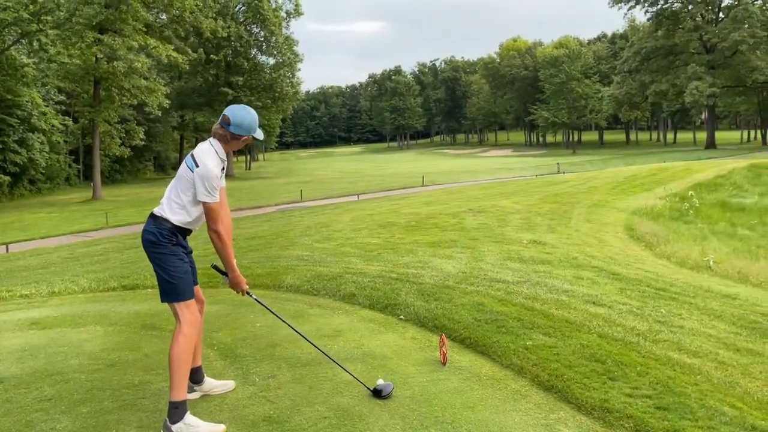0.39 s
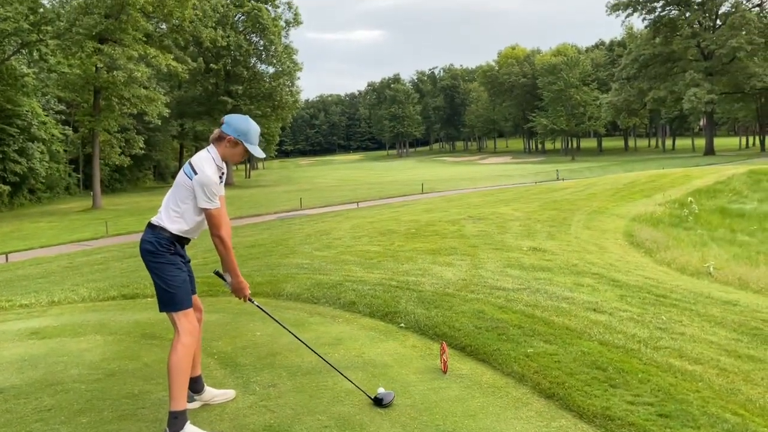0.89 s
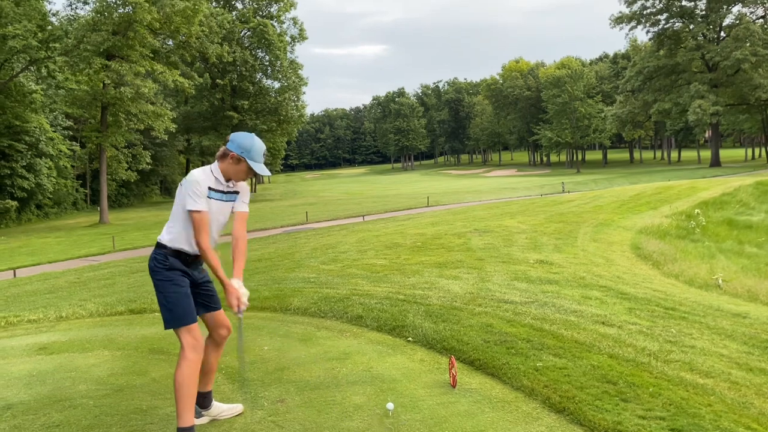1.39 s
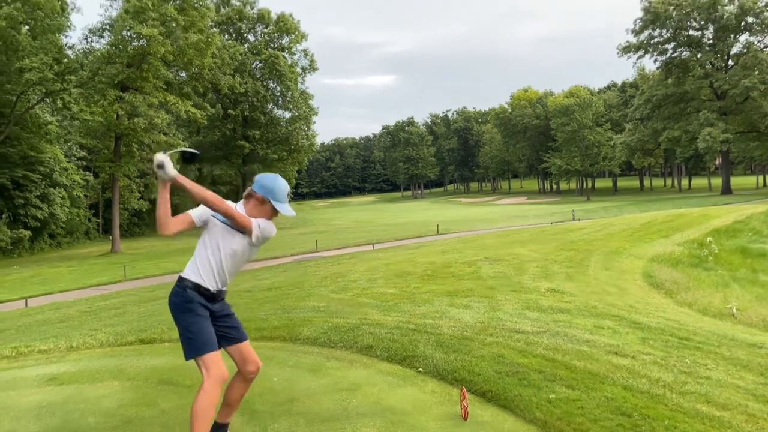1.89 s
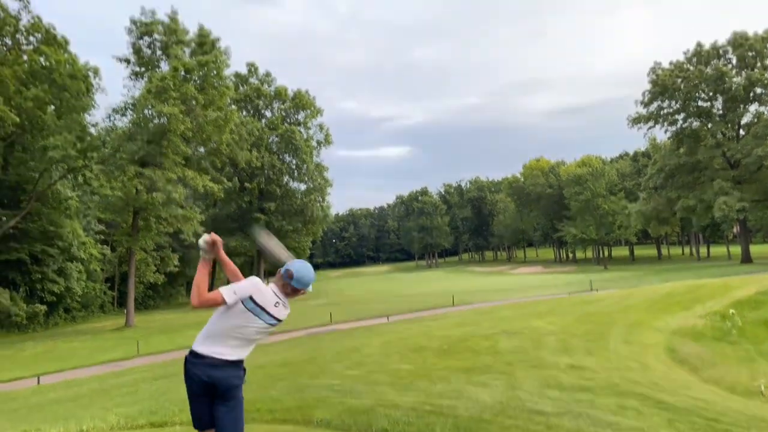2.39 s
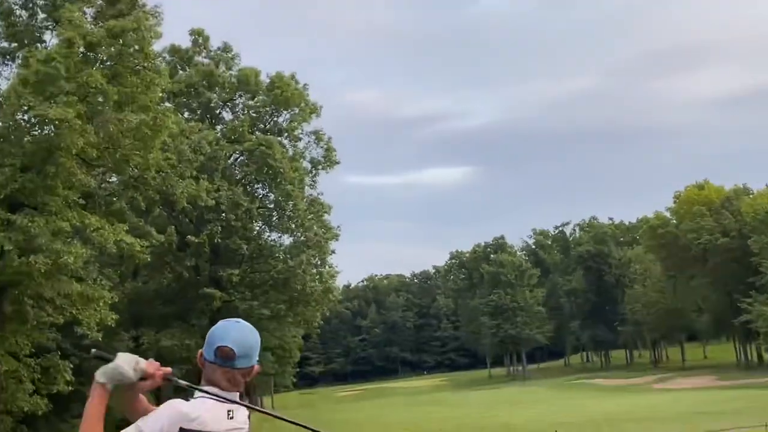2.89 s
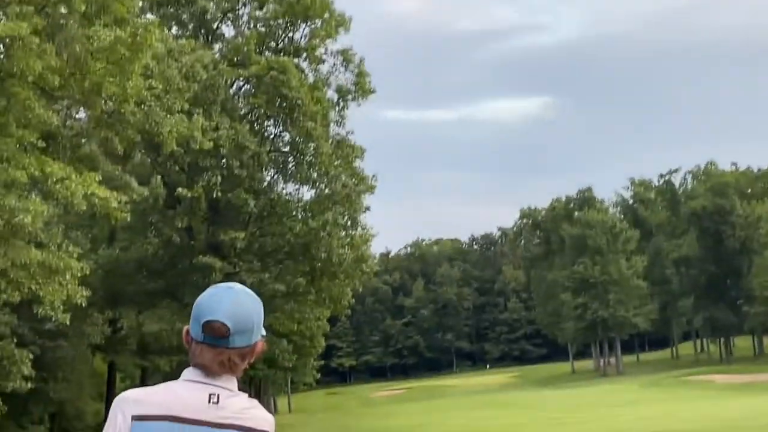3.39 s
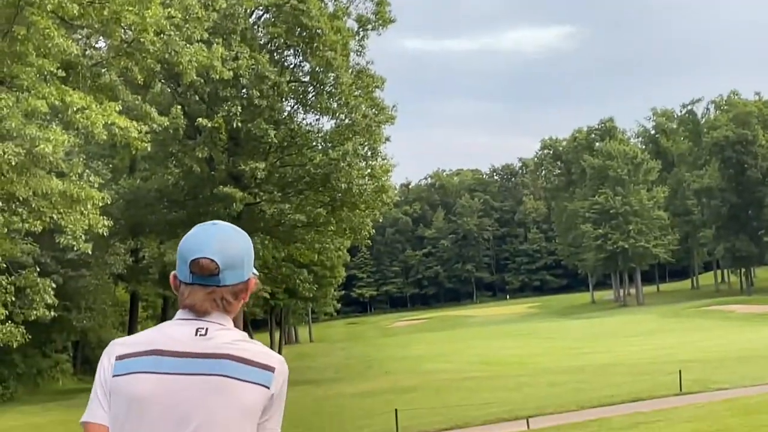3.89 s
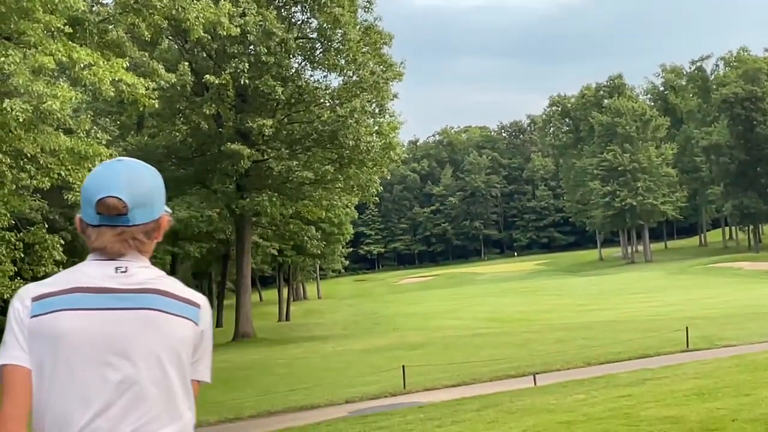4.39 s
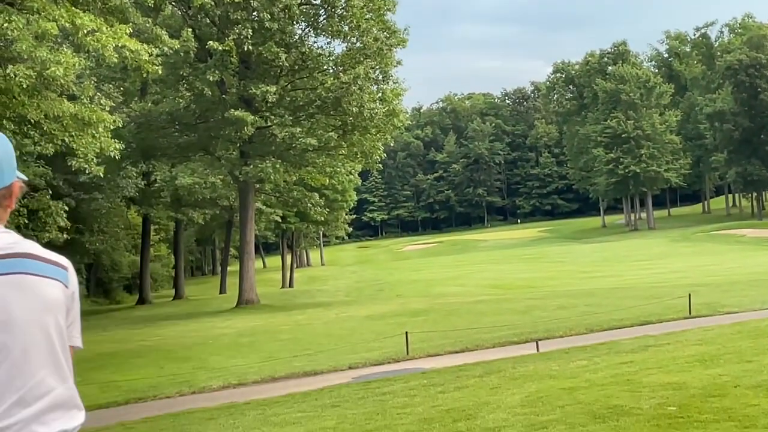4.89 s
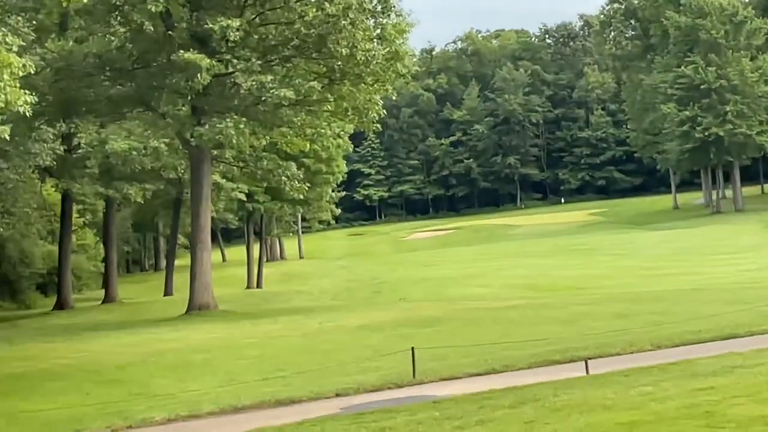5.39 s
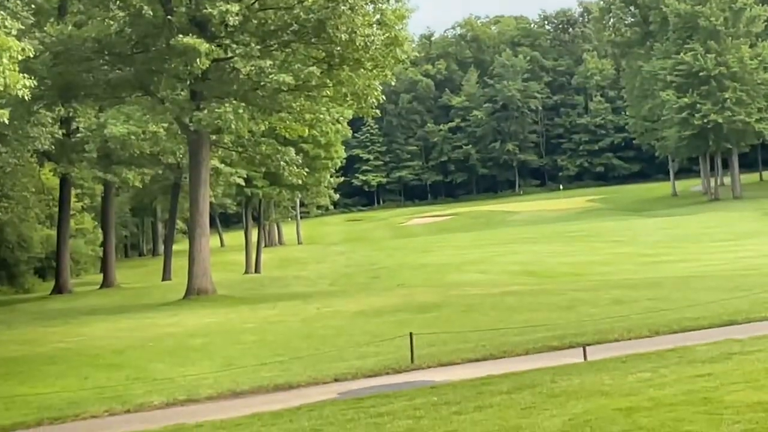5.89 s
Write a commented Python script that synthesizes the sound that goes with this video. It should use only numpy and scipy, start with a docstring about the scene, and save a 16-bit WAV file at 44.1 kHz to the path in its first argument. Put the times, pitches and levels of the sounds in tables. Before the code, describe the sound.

Birds chirp over a soft, rumbling open-air bed with small nearby ticks and rustles. A brief rising swish leads straight into one hard, bright, hollow metallic crack with a low thump and short ring, followed by scattered echoes from the tree line. Then a sharp leafy snap, a few woody knocks and duller taps are heard in the woods. Whistling birds carry on to the end, captured by a handheld stereo microphone.

```python
"""A low outdoor rumble (patchy noise) with a wavering far hum, soft rustles, trills, whistles and ticks.
A hollow metal golf club swishes down (noise round a rising band) and cracks a ball off a tee: a sagging
thump, a noise crack and dying head modes; grass and tree line throw the blow back as scattered noise.
The ball then tears through leaves (noise bursts) and knocks on branches (snaps and wooden modes).
All is heard by a small stereo microphone with gain control."""
import sys
import numpy as np
from scipy import signal
from scipy.fft import rfft, irfft, next_fast_len
from scipy.io import wavfile
from scipy.ndimage import uniform_filter1d

SR = 44100
rng = np.random.default_rng(int(sys.argv[2]) if len(sys.argv) > 2 else 0)


def voltage_ratio(decibels):
    """Convert decibels (scalar or array-like) to amplitude ratios, 20 dB per decade."""
    exponent = np.asarray(decibels, float) / 20
    return 10 ** exponent


def waveform_to_disk(signal):
    """Save audio, clipped to [-1, 1], as 16-bit WAV at the path in sys.argv[1]."""
    frames = np.transpose(np.atleast_2d(signal))
    scaled = np.clip(frames, -1, 1) * 32767
    samples = np.round(scaled).astype(np.int16)
    wavfile.write(sys.argv[1], SR, samples)


N = 265460
T = np.arange(N) / SR


def evened(x):
    """Scales to rms 1."""
    return x / np.sqrt(np.mean(x ** 2) + 1e-20)


def smoothed(x, bands, frames):
    """Smooths a frequency-by-time array over both axes, then evens it."""
    x = uniform_filter1d(x, size=bands, axis=0)
    return evened(uniform_filter1d(x, size=frames, axis=1))


def read(points, hz):
    """Reads a spectrum on a log-frequency axis."""
    f, value = np.transpose(points)
    return np.interp(np.log(hz + 1), np.log(f + 1), value)


def add(mix, s, sound, pan_db=0., lag=0):
    """Places a sound in both ears, L-R 0.95 pan_db; the right may lag by some samples."""
    for ear, side, late in ((0, 0.45, 0), (1, -.5, lag)):
        part = mix[ear, round(s * SR) + late:][:len(sound)]
        part += (sound * voltage_ratio(side * pan_db))[:len(part)]


def coloured(x, spectrum):
    """Gives x a spectrum and rms 1."""
    size = x.shape[-1]
    gain = voltage_ratio(read(spectrum, np.fft.rfftfreq(size, 1 / SR)))
    return evened(irfft(rfft(x) * gain, size))


def tone(hz):
    """Sine on a pitch curve: phase is the running sum of frequency."""
    return np.sin(2 * np.pi * np.cumsum(hz) / SR)


def ring(modes, t):
    """Dying sines that start together."""
    return sum(voltage_ratio(db - 60 * t / t60) * np.sin(2 * np.pi * hz * t) for hz, db, t60 in modes)


def curve(rows):
    """A level curve as a gain over the whole scene, silent outside its span."""
    rows = np.asarray(rows)
    return voltage_ratio(np.interp(T, rows[:, 0], rows[:, 1], -150, -150))


def burst(s, level_db, rise_db_s, fall_db_s):
    """A gain that climbs to its peak at s and falls away, straight in dB."""
    below_db = np.where(T < s, rise_db_s * (s - T), fall_db_s * (T - s))
    return voltage_ratio(level_db - np.minimum(below_db, 200))


def together(gains):
    """Adds gains of unrelated sounds by power."""
    return np.sqrt(sum(g ** 2 for g in gains))


def pair(x, same):
    """Mixes two unrelated rows into a left and right of the given likeness."""
    same = np.clip(same, 0, 1)
    return np.array([x[0], same * x[0] + np.sqrt(1 - same ** 2) * x[1]])


def woods(x, decay_s, level_db):
    """Trunks scatter sound back: a noise tail, unlike in each ear, duller as it dies."""
    hz, t, z = signal.stft(rng.standard_normal((2, SR)), SR, nperseg=256)
    # 60 dB down after decay_s / (1.5 + Hz / 9000)
    fade = voltage_ratio(-60 * t / decay_s * (1.5 + hz[:, None] / 9000))
    tail = signal.istft(z * fade, SR, nperseg=256)[1]
    tail /= np.linalg.norm(tail[0])
    return x + voltage_ratio(level_db) * signal.oaconvolve(x, tail, axes=1)[:, :N]


def scatter(start, gain, spectrum, same, crackle_db, streak_db, dulling_db, rise=0.):
    """Many small returns: wide crackles, narrow streaks; treble sinks (dB per kHz and s), colour may rise."""
    hz, t, z = signal.stft(pair(rng.standard_normal((2, N)), same), SR, nperseg=256)
    a, b = rng.standard_normal((len(t), len(hz), 2)).T
    crackle = smoothed(a, 30, 4)
    streak = smoothed(b, 2, 40)
    since = np.clip(t - start, 0, 1)
    colour_db = read(spectrum, hz[:, None] * (1 + rise * np.exp(-since / 0.084)))
    z *= voltage_ratio(colour_db + crackle_db * crackle + streak_db * streak)
    z /= np.sqrt(np.mean(abs(z) ** 2) * len(hz))  # evened before the treble sinks
    z *= voltage_ratio(-dulling_db * hz[:, None] / 1000 * since)
    return signal.istft(z, SR, nperseg=256)[1][:, :N] * gain


# rumble and leaf spectrum: f/Hz, relative level/dB per Hz
AIR = [(12, -63.5), (20, -33), (48, -2), (107, -3), (134, -17), (228, -21), (337, -24), (377, -25),
       (678, -35.5), (949, -36), (1530, -48.5), (2390, -45), (4540, -60), (5080, -54.5), (16000, -80)]
# left-right likeness of the air: f/Hz, likeness 0-1
SAME = [(60, 0.93), (180, 0.95), (550, 0.36), (1650, 0.38), (4970, 0.29), (15000, 0.19)]
# slow swell, full at 0 Hz, half at 300 Hz: t/s, level/dB
SWELL = [(0, 4), (0.501, 2.5), (1.5, -2), (2.5, 1.5), (3.3, 2), (3.6, -0.5), (4, 3), (4.4, 2), (4.9, -1),
         (5.4, 0), (6.02, -1.5)]
# soft rustles: middle t/s, half length/s, middle f/Hz, half width/octaves, level over air/dB
RUSTLES = [(0.211, 0.023, 5000, 1.7, 11), (1.19, 0.062, 8000, .8, 7), (1.507, 0.087, 4140, 0.56, 13.5),
           (1.948, .045, 1106, 1.1, 12), (1.94, 0.12, 5960, 0.97, 8.5), (3.951, .06, 752.4, 0.82, 10),
           (4.275, .04, 749.8, .6, 7.5), (4.405, 0.035, 4500, 1.7, 10), (4.642, 0.064, 6160, 0.248, 9.5),
           (5.052, 0.1, 2575, .3, 6.5), (5.65, .045, 6210, .25, 11)]


def air():
    """Far rumble and leaf rustle: noise in drifting time-frequency patches."""
    frames, hz = N // 256 + 5, np.fft.rfftfreq(1024, 1 / SR)[:, None]
    a, b, c, d, patches = rng.standard_normal((frames, 513, 5)).T
    patches = smoothed(patches, 14, 12)
    t = np.arange(frames) * 256 / SR
    swell_db = 300 / (hz + 300) * np.interp(t, *np.transpose(SWELL))
    for s, half_s, middle_hz, octaves, over_db in RUSTLES:
        off_time = ((t - s) / half_s) ** 4
        off_pitch = (np.log2((hz + 1) / middle_hz) / octaves) ** 2
        swell_db += over_db * np.exp(-off_time - off_pitch)
    noise = pair([a + 1j * b, c + 1j * d], read(SAME, hz))
    z = noise * voltage_ratio(read(AIR, hz) + 1.3 * patches + swell_db)
    return voltage_ratio(-50.5) * evened(signal.istft(z, nperseg=1024, noverlap=768)[1][:, :N])


# far hum: t/s, rms level/dB
HUM = [(0, -50.5), (.4, -69.5), (.6, -52.5), (1, -59), (2, -58), (2.7, -55.5), (3.1, -52.5), (3.3, -69),
       (4.5, -60), (5.5, -58), (5.8, -55), (6.02, -55)]


def hum():
    """A sine whose pitch wanders slowly."""
    hz = 105.8 + .9 * evened(uniform_filter1d(rng.standard_normal(N), size=8000))
    return np.sqrt(2) * curve(HUM) * tone(hz)


# trill phrases: first note t/s, last note t/s, nominal peak level/dB, nominal f/Hz
PHRASES = [(.0124, .0944, -70, 5500), (.2244, .3144, -75, 5150), (.3924, .5054, -71, 5400),
           (.6194, .7144, -75, 5150), (.7774, .8924, -74, 5330), (1.0564, 1.1894, -73, 5250),
           (1.3834, 1.5554, -75, 5230), (1.7624, 1.9414, -73, 5210), (5.2094, 5.2944, -84, 5350),
           (5.9294, 5.9294, -79, 5250)]


def trill():
    """Phrases of short falling sine notes, wet with the woods."""
    note_gap_s, note_s, note_fall = .042, .024, .13  # fall: share of pitch
    loudest_place, start_db = 0.88, -5  # place in phrase 0-1; first note under loudest
    out, u = np.zeros((2, N)), np.linspace(0, 1, round(note_s * SR))
    for first, last, peak_db, nominal_hz in PHRASES:
        for place in np.linspace(0, 1, 1 + round((last - first) / note_gap_s)):
            hz = nominal_hz * (1 + note_fall * (.35 - u) + .012 * rng.standard_normal())
            level_db = peak_db + start_db * (place / loudest_place - 1) ** 2
            level_db += 1.5 * rng.standard_normal()
            note = voltage_ratio(level_db) * tone(hz) * np.sin(np.pi * u)
            add(out, first + place * (last - first), note, -3.)
    return woods(out, .6, -7)


# leaf noise, also the snap of a knock: f/Hz, relative level/dB per Hz
LEAF = [(180, -68), (300, -4.5), (1290, -8.5), (1940, -4.5), (5530, -4), (7420, -12), (8320, -14.5),
        (9330, -16.5), (11900, -22), (15400, -38), (16200, -66)]
# click of the hard ball: f/Hz, relative level/dB, t60/s
SHELL = [(4500, 5, 0.003)]
# wood modes before dulling: f/Hz, relative level/dB, t60/s
WOOD = [(380, -2, .03), (650, 0, .03), (1050, -3, .022), (1500, -7, .018), (2100, -8, .012)]


def knocks(rows, snap_t60_s):
    """A bright noise snap and click blended with a short wooden ring."""
    out, t = np.zeros((2, N)), np.arange(2000) / SR
    noises = rng.standard_normal((len(rows), len(t)))
    for (s, level_db, dull, pan_db), noise in zip(rows, noises):
        snap = coloured(noise, LEAF) * voltage_ratio(-60 * t / snap_t60_s) / 2 + ring(SHELL, t) / 2
        # dull blows wake the low modes
        modes = [(hz, db - 7 * dull ** 3 * hz / 1000, t60) for hz, db, t60 in WOOD]
        wood = ring(modes, t) * (1 - np.exp(-t / 0.00055)) / 2
        add(out, s, voltage_ratio(level_db) * ((1 - dull) * snap + dull * wood), pan_db)
    return out


# small ticks close by: t/s, nominal level/dB, dullness 0-1, pan/dB
TICKS = [(.0294, -55, 0.46, 4), (.1925, -46.5, 0.43, -3), (.4199, -38, 0.75, -9), (.8944, -45.5, 0.62, -3),
         (1.7893, -51.5, 0.67, 12), (1.9066, -59, 0.2, 8), (1.9415, -44.5, 0.76, 1),
         (2.7694, -46.5, 0.6, -4), (2.8194, -52, 0.4, -3), (2.8894, -47.5, 0.72, -1), (2.9994, -55, 0.3, 1)]


def ticks():
    """Knocks left dry, without the woods."""
    return knocks(TICKS, 0.0092)


def chorus():
    """Faint far birds: many short glides at random moments, all blurred by the woods."""
    out, u = np.zeros((2, N)), np.linspace(0, 1, 2200)
    for when, pitch, glide, loud, side in rng.random((150, 5)):
        hz = (2000 + 1100 * pitch) * (1 + 0.17 * (glide - .6) * u)
        note = tone(hz) * np.sin(np.pi * u)
        add(out, when * N / SR, voltage_ratio(-93 + 6 * loud) * note, 12 * (side - .5))
    return woods(out, .8, 5)


# place of the whistles as the microphone turns after the ball: t/s, pan/dB
BIRD_SIDE = [(0, -2.5), (1.2, -9), (2.0, -4.5), (2.6, 11), (4.0, 1), (6, 2)]


def whistle(out, s, hz, level_db, edge):
    """Adds a near sine on a pitch curve; its path through leaves flutters."""
    flutter = evened(uniform_filter1d(rng.standard_normal(len(hz)), size=350))
    note = tone(hz) * signal.windows.tukey(len(hz), edge)
    pan_db = np.interp(s, *np.transpose(BIRD_SIDE))
    add(out, s, np.sqrt(2) * voltage_ratio(level_db + 2.1 * flutter) * note, pan_db)


# sliding chirps: start t/s, length/s, level/dB, first f/Hz, last f/Hz
SLIDES = [(0.151, 0.0273, -80.5, 3310, 2570), (.615, .03, -96, 3150, 2960), (.84, .04, -72, 2330, 2075),
          (1.0, .035, -81, 3500, 3130), (1.025, .06, -71.5, 2700, 2105), (1.3, .04, -86, 3050, 2880),
          (1.35, .08, -78.5, 2420, 2529), (1.38, .05, -77.5, 2750, 3070), (1.515, .04, -74.5, 2680, 1900),
          (1.96, .03, -76, 3500, 3120), (1.99, .06, -71.5, 2460, 2043), (4.213, .13, -74, 1150, 2120),
          (4.42, .03, -76, 2200, 3000), (4.48, .08, -75, 2100, 1873), (4.91, .115, -74.5, 3150, 2223)]


def slides(out):
    """Short chirps that slide quickest at their start."""
    for s, length, level_db, first_hz, last_hz in SLIDES:
        u = np.arange(0, length, 1 / SR) / length
        whistle(out, s, first_hz + (last_hz - first_hz) * u ** .85, level_db, .4)


# hooked calls: start t/s, rise/s, drop/s, level/dB, top f/Hz
HOOKS = [(.183, .015, .052, -69, 2940), (2.615, .085, .045, -72, 1730), (4.445, .01, .012, -74, 3070)]


def hooks(out):
    """Calls that rise to a top pitch and drop away."""
    rise_share, drop_share = .18, .28  # of the top pitch
    for s, rise, drop, level_db, top_hz in HOOKS:
        t = np.arange(-rise, drop, 1 / SR)
        below = np.where(t < 0, rise_share * (t / rise) ** 2, drop_share * abs(t / drop) ** 1.3)
        whistle(out, s, top_hz * (1 - below), level_db, .25)


# held whistles: start t/s, length/s, start level/dB, settled f/Hz, start above it/Hz
HELD = [(0.323, 0.17, -64.5, 2510, 168), (1.797, 0.16, -77.5, 2410, 169.5), (3.068, 0.054, -81, 3280, 3),
        (3.165, 0.046, -85.5, 3250, 0), (3.26, 0.046, -78, 3130, 60), (3.838, .11, -78.5, 2790, 112),
        (3.987, .07, -74, 2730, 22), (4.132, 0.13, -78.5, 2730, 21), (4.344, .065, -73.5, 2180, 33),
        (5.028, 0.47, -68.5, 3160, 190), (5.587, 0.075, -85, 2280, 1), (5.67, .09, -87, 2740, 80)]


def held(out):
    """Whistles that settle from above onto their pitch and fade."""
    settle_s, fade_db_s = .035, 42
    for s, length, level_db, hz, above_hz in HELD:
        t = np.arange(0, length, 1 / SR)
        settling_hz = hz + above_hz * np.exp(-(t / settle_s) ** 2)
        whistle(out, s, settling_hz, level_db - fade_db_s * t, .2)


def whistles():
    """Slides, hooks and held notes, wet with the woods."""
    out = np.zeros((2, N))
    slides(out)
    hooks(out)
    held(out)
    return woods(out, 1.2, -3.5)


# club cutting air: t/s, level/dB, centre of the shed vortices f/Hz
SWISH = [(2.02, -70, 399), (2.05, -52.5, 502.7), (2.075, -40, 683.4), (2.1, -35.5, 800), (2.125, -33, 800),
         (2.135, -29, 800)]
# broad hiss of the swish: f/Hz, relative level/dB per Hz
SWISH_HISS = [(88, -45), (150, -15), (303, -2), (477, -15.5), (753, -2.5), (893, -13), (1550, -18.5),
              (1940, -26), (5500, -26), (8390, -35), (15500, -37), (16300, -62)]


def swish():
    """Turbulent noise whose loudest band rises with club speed."""
    hiss = pair(coloured(rng.standard_normal((2, N)), SWISH_HISS), 0.77)
    s, _, centre_hz = np.transpose(SWISH)
    turn = np.exp(2j * np.pi * np.cumsum(np.interp(T, s, centre_hz)) / SR)
    r = np.exp(-np.pi * 460 / SR)  # pole radius of the resonance
    # shift down, low-pass, shift back: a band that follows centre_hz
    slow = signal.lfilter([1], [1, -2 * r, r * r], rng.standard_normal(N) / turn)
    vortices = evened((turn * slow).real)
    return curve(SWISH) * (0.8 * hiss + .6 * vortices)


HIT_S = 2.1342
# low push of the blow: start f/Hz, time to half pitch/s, time to peak/s, level/dB
THUMP = (1000, .0015, .003, -7.5)


def thump(t):
    """A sine that sags in pitch under a swell and decay."""
    start_hz, sag_s, swell_s, level_db = THUMP
    sag = -np.sin(2 * np.pi * start_hz * sag_s * np.log(1 + t / sag_s))
    return voltage_ratio(level_db) * sag * t / swell_s * np.exp(1 - t / swell_s)


# club head modes: f/Hz, relative level/dB, t60/s
HEAD = [(800, 3, 0.012), (1070, 5.5, 0.0118), (1510, 3.5, .012), (2334, -10, 0.069), (3680, -25.5, .06),
        (4000, -0.5, 0.048), (4051, -9, .09), (4722, -7.5, 0.12), (5000, -4.5, 0.028), (5730, -10, 0.07),
        (5850, -17, .06), (6170, -14, 0.11), (6570, -14, 0.06), (7320, -8, 0.033), (9250, -20.5, .05),
        (10208, -16, 0.053), (10850, -22, .06), (10570, -16, .04)]


def head(t):
    """Dying modes; the head first flies away, so its ring starts flat and rises."""
    heard = t - .045 * .03 * (1 - np.exp(-t / .03))
    return voltage_ratio(-13.5) * ring(HEAD, heard) * (1 - np.exp(-t / 0.00033))


# crack noise: f/Hz, relative level/dB per Hz
CRACK = [(1800, -30), (2500, -10), (3320, -12), (3910, -3.5), (5200, -3), (7260, -10.5), (8300, -9.5),
         (10200, -13), (13000, -19.5), (16000, -17), (17500, -44.5)]


def crack(t):
    """Noise that dies fast, then slower."""
    noise = pair(coloured(rng.standard_normal((2, len(t))), CRACK), 0.51)
    return noise * voltage_ratio(-8) * (voltage_ratio(-60 * t / .004) + voltage_ratio(-3.5 - 60 * t / 0.035))


# returns from near grass at once, tree line later: delay/s, level/dB, rise/(dB/s), fall/(dB/s)
RETURNS = [(.016, -39.5, 3000.5, 400), (.186, -43, 70, 59), (.25, -54.5, 60, 24)]
# blurred ring of the head: f/Hz, relative level/dB per Hz
ECHO_COLOUR = [(150, -32), (300, -10), (950, -11.5), (1800, -16.5), (2200, -11.5), (2520, -2), (2800, -13),
               (3400, -16), (4200, -6), (4600, -1.5), (5000, -12.5), (6100, -6.5), (7000, -5.5),
               (8300, -14.5), (10500, -17), (13800, -24.5), (15400, -22.5), (16200, -58.5)]


def echoes():
    """The blow smeared back from grass and trees as scattered noise."""
    gain = together(burst(HIT_S + s, *row) for s, *row in RETURNS) * (T > HIT_S)
    return scatter(HIT_S, gain, ECHO_COLOUR, .6, 1.7, 2.6, 3.1, rise=0.12)


def drive():
    """Thump, crack and ring of the head, the ring again off the turf, then the returns."""
    t = np.arange(SR // 3) / SR
    turf_delay_s, turf_db = .0027, -5.5
    out, head_ring = echoes(), head(t)
    add(out, HIT_S, thump(t) + head_ring, -.6, lag=3)
    add(out, HIT_S + turf_delay_s, voltage_ratio(turf_db) * head_ring, -1.5)
    out[:, round(HIT_S * SR):][:, :len(t)] += crack(t)
    return out


# ball entering a clump of leaves: t/s, level/dB
LEAF_BURSTS = [(3.3173, -50), (3.3313, -41), (3.468, -46.5), (3.615, -56.5)]


def leaves():
    """Leaves torn and shaken by the ball: each burst snaps off and leaves a slowly settling shiver."""
    rise_db_s, snap_fall_db_s, shiver_fall_db_s, shiver_db = 15000, 470, 33.3, -14
    snaps = [burst(s, db, rise_db_s, snap_fall_db_s) for s, db in LEAF_BURSTS]
    shivers = [burst(s, db + shiver_db, rise_db_s, shiver_fall_db_s) for s, db in LEAF_BURSTS]
    return scatter(LEAF_BURSTS[0][0], together(snaps + shivers), LEAF, 0.99, 1.1, 0.7, 3.2)


# ball on twigs and branches: t/s, nominal level/dB, dullness 0-1, pan/dB
KNOCKS = [(3.318, -33, 0.4, 3), (3.3301, -20, 0, -3), (3.349, -48, 0.7, 0), (3.465, -34.5, 0.6, 7),
          (3.474, -30, 0.65, -1), (3.604, -42.5, 0.83, 6.5), (3.91, -43, 0.98, 0), (3.939, -37, 0.98, 1),
          (4.285, -39.5, 0.96, 1)]


def branches():
    """Knocks of the ball on wood, wet with the woods."""
    return woods(knocks(KNOCKS, 0.0094), 1.0, -14.5)


def scene():
    """All sources together."""
    background = air() + hum() + trill() + ticks() + chorus() + whistles()
    return background + swish() + drive() + leaves() + branches()


# treble likeness and phase of the microphone ports: f/Hz, left share in right 0-1, left lead/rad
PORTS = [(5800, 0, 0), (6700, .6, -.7), (7750, .85, -2.9), (8800, .9, -3.4), (9800, .8, -4.8),
         (10850, .9, -6.1), (12400, .9, -6.6), (14000, .95, -9.3), (18000, .95, -9.5)]


def ports(x):
    """Makes the treble of both channels alike and turns them apart in phase."""
    size = next_fast_len(N + 2048)
    hz, same, lead = np.transpose(PORTS)
    f = np.fft.rfftfreq(size, 1 / SR)
    z = pair(rfft(x, size), np.interp(f, hz, same))
    turn = np.exp(.5j * np.interp(f, hz, lead))
    return irfft(z * [turn, 1 / turn], size)[:, :N]


# fold of the upper middle to the centre: start t/s, low f/Hz, high f/Hz
FOLD = (2.68, 2800, 6100)


def folded(x):
    """From the moment of the fold on, one band loses its left-right difference."""
    s, lo_hz, hi_hz = FOLD
    band = signal.butter(6, [lo_hz, hi_hz], "band", fs=SR, output="sos")
    side = signal.sosfiltfilt(band, x[0] - x[1]) / 2
    return x - np.clip((T - s) / .02, 0, 1) * side * [[1], [-1]]


def gain_control(x, dry):
    """Ducks x by 0.13 dB per dB of held dry power over -32 dB; the hold falls steadily."""
    power = uniform_filter1d((dry ** 2).mean(0), size=200, origin=99)
    power_db = 10 * np.log10(abs(power) + 1e-12)
    fall_db = T * 91.0  # hold falls 91 dB/s
    over_db = np.maximum(np.maximum.accumulate(power_db + fall_db) - fall_db + 32, 0)
    return x / voltage_ratio(0.13 * uniform_filter1d(over_db, size=300, origin=149))


def band_limit(x):
    """A steep low-pass at the top of the band."""
    return signal.sosfilt(signal.butter(12, 17840, fs=SR, output="sos"), x)


def record(dry):
    """Port pair and fold, gain control, soft overload, then band limit."""
    ducked = gain_control(folded(ports(dry)), dry)
    overloaded = .95 * np.tanh(ducked / .95)
    limited = signal.sosfilt(signal.butter(12, 16800, fs=SR, output="sos"), overloaded)
    return band_limit(limited)


dry = scene()
out = record(dry)
waveform_to_disk(out)
```